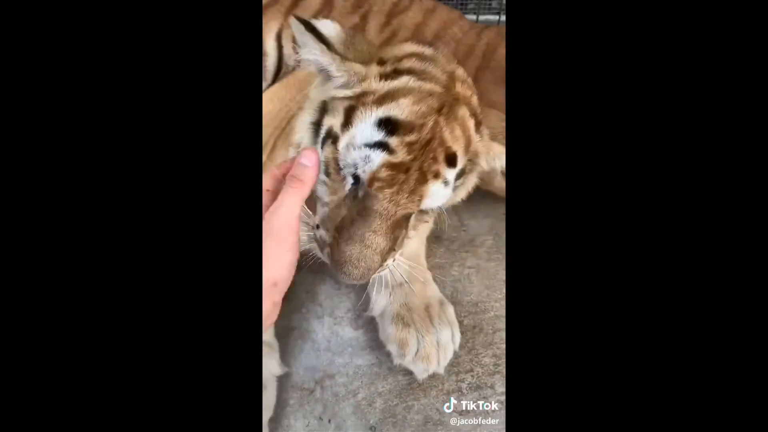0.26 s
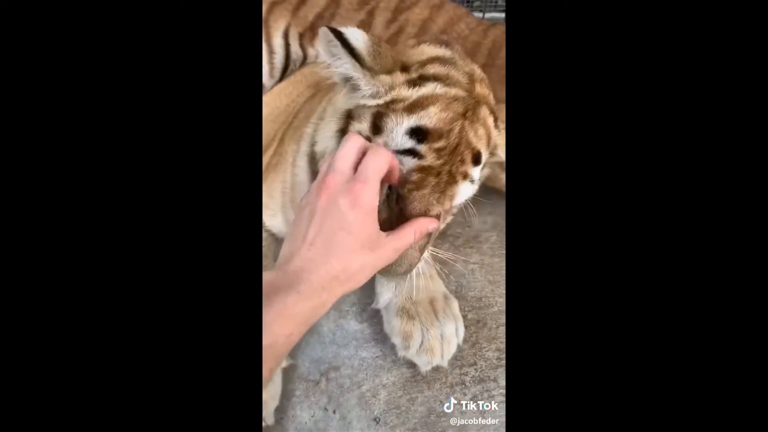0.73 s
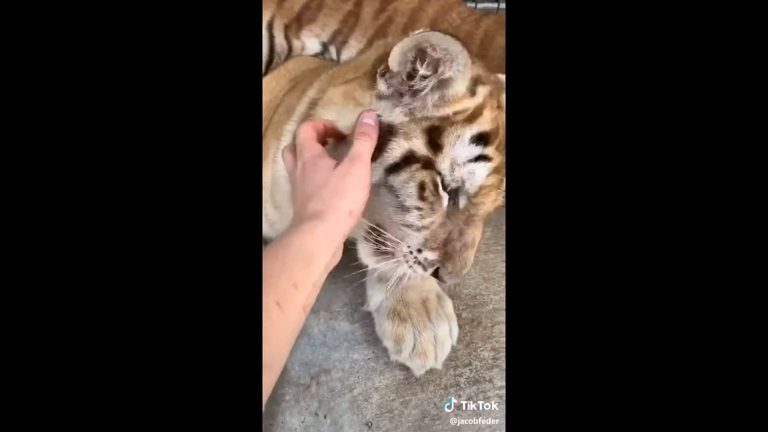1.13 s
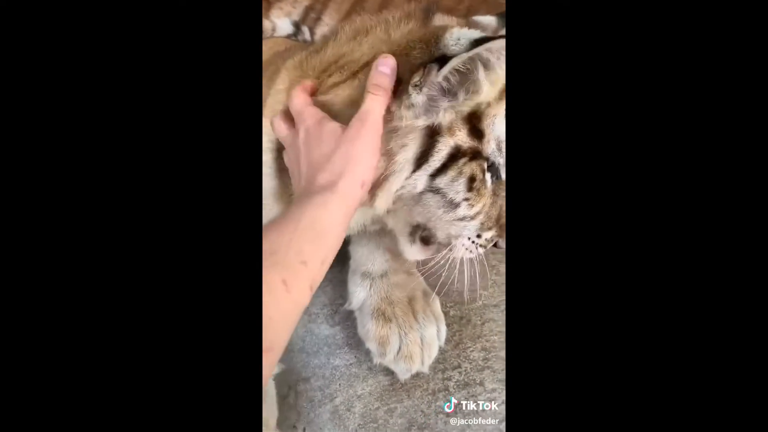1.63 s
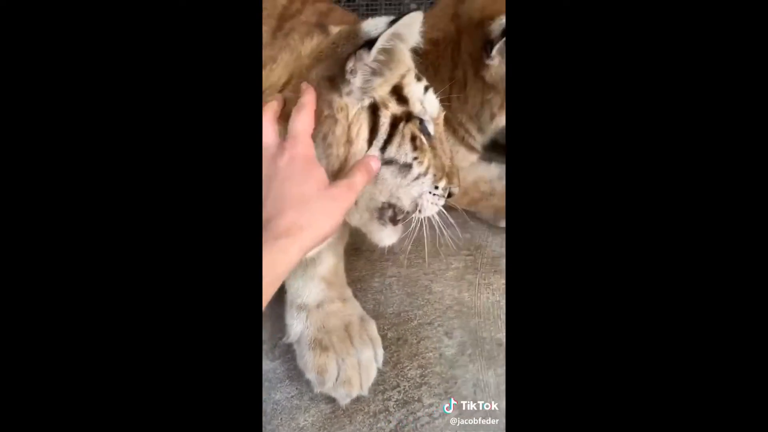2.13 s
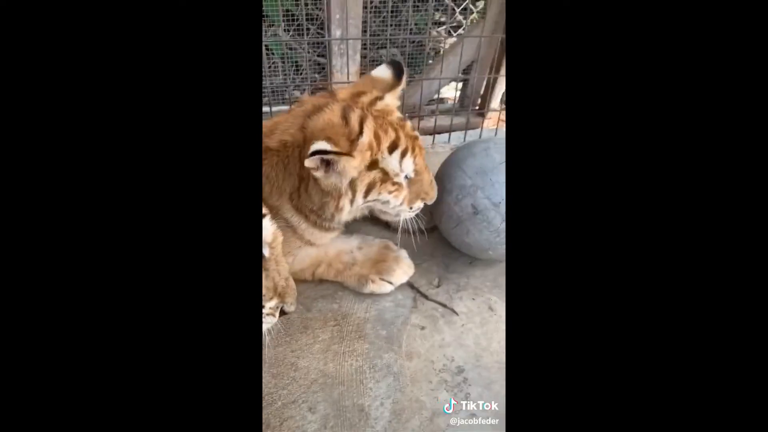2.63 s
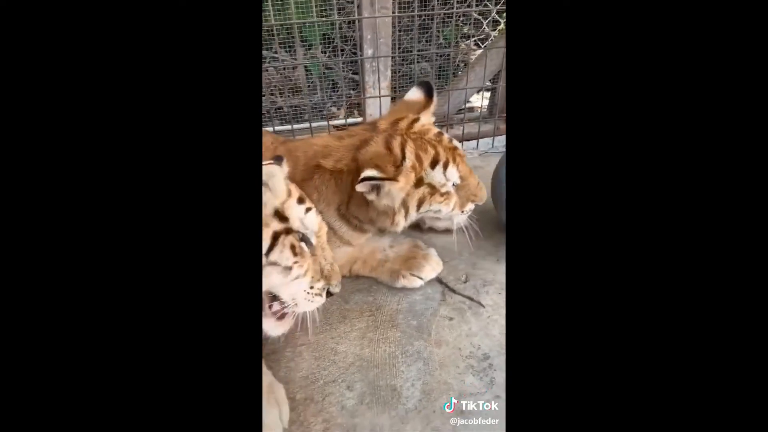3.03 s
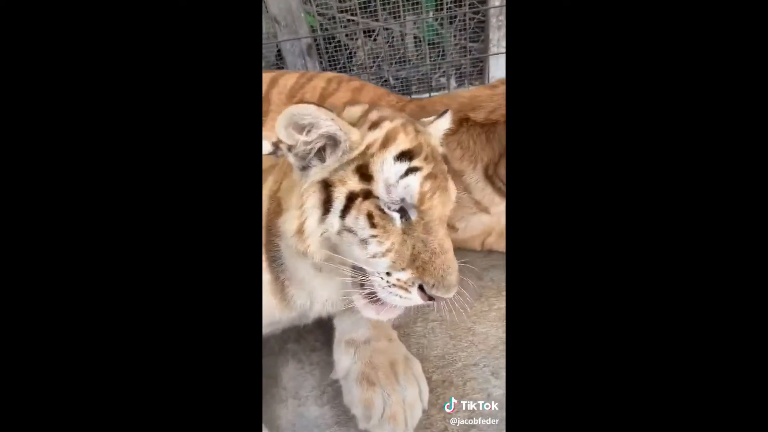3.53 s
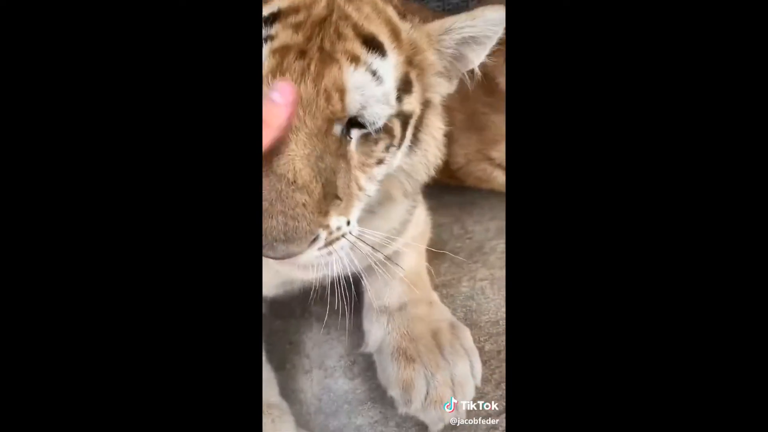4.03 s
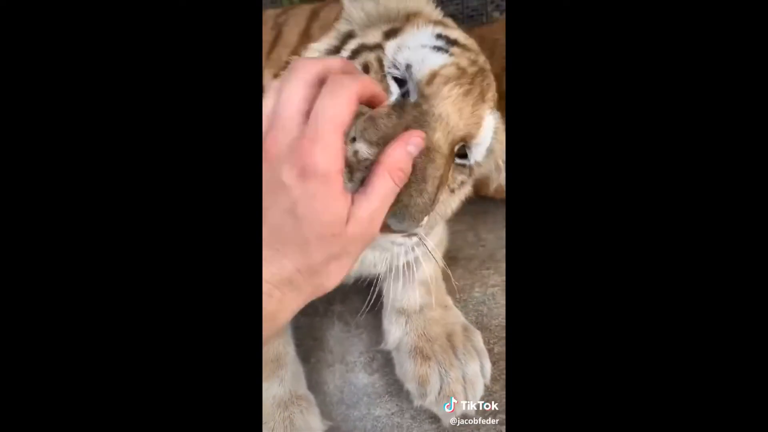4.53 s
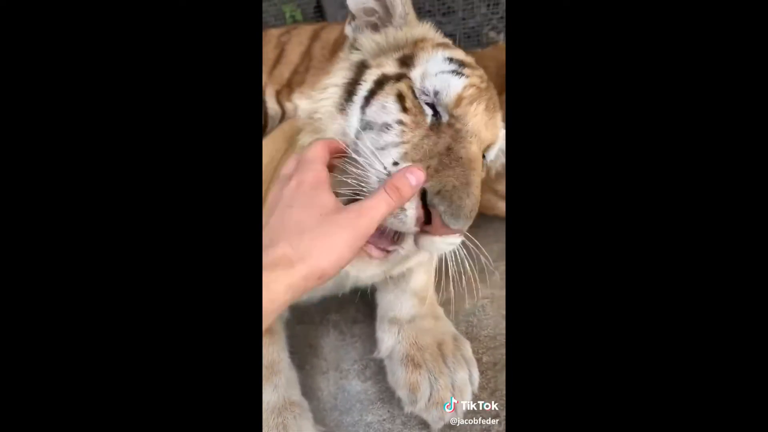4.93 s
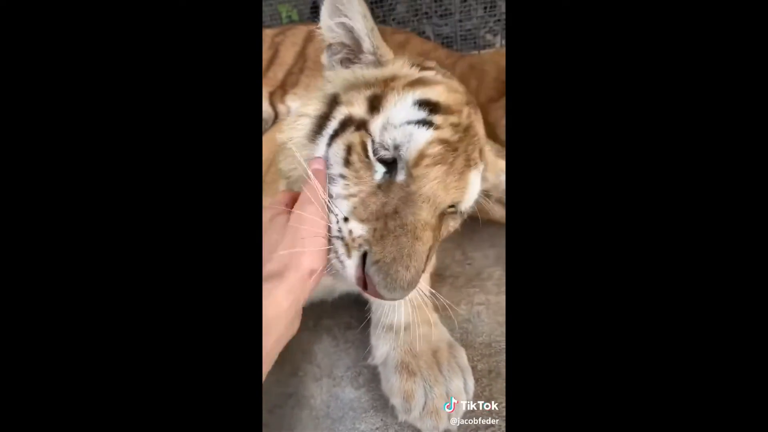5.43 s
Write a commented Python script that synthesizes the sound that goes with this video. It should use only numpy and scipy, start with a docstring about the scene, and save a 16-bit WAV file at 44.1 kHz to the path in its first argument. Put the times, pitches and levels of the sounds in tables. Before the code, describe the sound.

Close rasping big cat growl: a soft fast rattle, hard separate clacking pops, a pause, a snorting snarl, then steady slow popping again.

```python
"""In a roofed pen with a concrete floor, a young tiger is stroked close to a phone.
Its growl is a row of single throat pops, now a quick soft rattle, now slow and hard: folds burst open
and excite resonances, a low thump and a boom. Once it grunts and snarls, as a fold tone and shaped noise.
Wet lips click and air hisses as filtered noise; paws and fur stir.
The pen answers with echoes and a diffuse tail over a low hum."""
import sys
import numpy as np
from scipy import signal
from scipy.fft import rfft, irfft
from scipy.io import wavfile
from scipy.ndimage import uniform_filter1d, minimum_filter1d, map_coordinates

SR = 44100
rng = np.random.default_rng(int(sys.argv[2]) if len(sys.argv) > 2 else 0)


def wav_out(sig):
    """Save sig, one row per channel (or a flat mono array), as 16-bit PCM at SR to the path in sys.argv[1]."""
    wavfile.write(sys.argv[1], SR, np.round(np.clip(np.atleast_2d(sig).T, -1, 1) * 32767).astype(np.int16))


N = 249988
TIME, BINS = np.arange(N) / SR, np.fft.rfftfreq(N, 1 / SR)  # [s], [Hz]

# spectrum of air hissing at nose and teeth, and of brushed fur: (frequency [Hz], relative level [dB])
HISS_SPECTRUM = [(400, 7.5), (700, -6), (950, 9.5), (2400, 13), (2900, 11.5), (3500, 2), (4200, 10.5),
                 (5200, 8.5), (7200, 6), (9500, 1.5), (11000, 2), (13000, -40)]


def amp(db):
    """Level law: decibels to amplitude gain."""
    return 10 ** (np.asarray(db) / 20)


def unit(x):
    """Power normalization: scales to an rms of one."""
    return x / np.sqrt(np.mean(x ** 2) + 1e-20)


def read(points, hz):
    """Linear interpolation of a table on a log-frequency axis."""
    f, value = np.transpose(points)
    return np.interp(np.log(hz + 1), np.log(np.abs(f) + 1), value)


def add(mix, s, sound):
    """Superposition: adds a sound to the mix at time s."""
    part = mix[max(round(s * SR), 0):][:len(sound)]
    part += sound[:len(part)]


def colour(x, spectrum):
    """Minimum-phase filtering: gives white sound this spectrum, causally, and keeps its power."""
    hz = np.abs(np.fft.fftfreq(4096, 1 / SR))
    log_gain = np.log(unit(amp(read(spectrum, hz))))
    # the phase follows from the log gain by a Hilbert transform
    taps = np.fft.ifft(np.exp(np.conj(signal.hilbert(log_gain)))).real
    return signal.oaconvolve(x, taps[:len(taps) // 2])[:len(x)]


def drift(rate_hz):
    """Low-pass noise: a smooth random course of rms one with a Gaussian spectrum."""
    size = 8192
    hz = np.fft.rfftfreq(size, TIME[-1] / size)
    slow = irfft(rfft(rng.standard_normal(size)) * np.exp(-(hz / rate_hz) ** 2))
    return unit(np.interp(TIME, np.linspace(0, TIME[-1], size), slow))


def ring(t, hz, t60):
    """Free damped vibration: one mode that falls 60 dB in t60 seconds."""
    return np.sin(2 * np.pi * hz * t) * amp(-60 * t / t60)


def push(start, attack, hold, release):
    """Airflow envelope: linear rise, hold, then exponential decay of 60 dB over the release."""
    rise = np.clip((TIME - start) / attack, 0, 1)
    return rise * amp(-60 * np.maximum(TIME - start - attack - hold, 0) / release)


def bursts(times, levels_db, rise_s, decay_s, grain):
    """Transient turbulence: grainy noise with exponential rise and decay, levelled by its loudest 4 ms."""
    out, t = np.zeros(N), np.arange(SR // 8) / SR
    for s, db in zip(times, levels_db):
        noise, size = rng.standard_normal((2, len(t)))
        burst = noise * np.exp(grain * size - t / decay_s) * (1 - np.exp(-t / rise_s))
        add(out, s, amp(db) * burst / np.sqrt(uniform_filter1d(burst ** 2, SR // 250).max()))
    return out


def diffuse(pair):
    """Spatial coherence: two unrelated signals become one sound in two channels, band by band."""
    # likeness of the left and right channels: (frequency [Hz], correlation from -1 opposed to 1 alike)
    likeness = [(100, 1), (400, 0.87), (900, 0.14), (1250, 1), (1550, 0.66), (2150, 0.65), (2600, -0.78),
                (3800, 0.3), (4700, -0.6), (5700, -0.71), (7200, 1), (9400, 0.88), (10500, -0.48),
                (12500, -0.9121)]
    a, b = rfft(pair)
    same = np.clip(read(likeness, np.fft.rfftfreq(len(pair[0]), 1 / SR)), -1, 1)
    return irfft(np.array([a, same * a + np.sqrt(1 - same ** 2) * b]), len(pair[0]))


def ambience(level_db=-42, waver_db=2):
    """Stationary noise and steady tones: low rumble and faint hiss around the pen, with a wavering hum."""
    # rumble and hiss: (frequency [Hz], relative level [dB])
    spectrum = [(15, -22), (25, -8), (49, -8.5), (92, -12), (137, -2.5), (219, -19.5), (257, -22.5),
                (293, -17.5), (333, -24), (975, -34), (1270, -32.5), (2930, -36.5), (8330, -40),
                (13000, -48)]
    # hum before its wavering: (frequency [Hz], rms level [dB])
    hum_tones = [(123.7, -55), (61.9, -59)]
    noise = diffuse(np.array([colour(n, spectrum) for n in rng.standard_normal((2, N))]))
    hum = np.zeros(N)
    for hz, db in hum_tones:
        tone = unit(np.sin(2 * np.pi * hz * TIME + drift(rate_hz=0.9)))
        hum += amp(db + waver_db * drift(rate_hz=5.7)) * tone
    return amp(level_db) * unit(noise) + hum


def pen(x, onset_s=0.015):
    """Diffuse reverberation: the tail is strongest in the bass; it changes as the phone moves."""
    # decay of the pen, held to at least 0.02 s: (frequency [Hz], t60 [s])
    decay = [(100, 1.7), (200, 0.8), (500, -0.38), (1400, 0.17), (4000, 0.29), (10000, 0)]
    # strength of the pen: (frequency [Hz], gain [dB])
    strength = [(40, -3), (90, 0), (140, -4.5), (300, -9), (600, -6), (1300, -28), (3000, -13.5),
                (8000, -7)]
    out, count = np.zeros((2, N)), 3
    for k in range(count):
        noise = diffuse(rng.standard_normal((2, SR)))
        hz, t, z = signal.stft(noise, SR, nperseg=256)
        t60 = np.maximum(read(decay, hz), .02)[:, None]
        z *= amp(read(strength, hz)[:, None] - 60 * t / t60)
        z *= np.sqrt(2 * np.log(1000) / (t60 * SR))  # equal energy for any decay time
        tail = signal.istft(z, SR, nperseg=256)[1][:, :SR] * np.clip(TIME[:SR] / onset_s - .5, 0, 1)
        # the sound passes from tail to tail at constant total power
        share = np.cos(np.pi * (TIME * 2 + k / count)) * np.sqrt(2 / count)
        out += signal.fftconvolve((x * share)[None], tail, axes=1)[:, :N]
    return out


def far_walls(x, sway_s=0.00078):
    """Late specular reflection: roof and far walls return the body of each pop a few times, dull and late."""
    # late echoes: (delay [s], relative gain)
    paths = [(0.036, 0.62), (0.0403, 0.5), (0.0564, 0.6)]
    # their colour: (frequency [Hz], relative level [dB])
    spectrum = [(100, -13), (250, -5), (450, 5.5), (800, -10), (1150, -10), (2500, -20), (6000, -12.5)]
    dull = colour(x, spectrum) * amp(-26)
    out = np.zeros(N)
    for delay, gain in paths:
        out += gain * np.interp(TIME - delay - sway_s * drift(rate_hz=1.15), TIME, dull, left=0)
    return out


def reflect(x, sway_s=0.00007):
    """Early reflection: near surfaces return the sound; the paths change as the head moves."""
    # reflections from floor, body and walls: (delay [s], gain)
    paths = [(.0036, 0.67), (.0074, 0.9), (0.0178, 0.17), (0.026, 0.15)]
    out = x.copy()
    for delay, gain in paths:
        out += gain * np.interp(TIME - delay - sway_s * drift(rate_hz=1.83), TIME, x, left=0)
    return out


def shifting():
    """Impact and friction noise: the tiger shifts its weight with dull bumps, soft scuffs and a brush of fur."""
    # bumps of paws and body on the floor: (time [s], level [dB])
    bumps = [(2.923, -44), (3.309, -41), (3.498, -39)]
    # their spectrum: (frequency [Hz], relative level [dB])
    bump_spectrum = [(60, -11), (150, -2), (330, 10), (700, -15), (1500, -13), (4000, -51)]
    # scuffs on the floor: (start [s], attack [s], hold [s], release [s], level [dB])
    scuff_pushes = [(2.865, 0.02, 0.05, 0.2, -55), (3.285, 0.02, 0.05, 0.2, -52)]
    # their spectrum: (frequency [Hz], relative level [dB])
    scuff_spectrum = [(250, -3), (600, 4), (1300, 6), (2000, -9), (2800, -28), (8000, -31)]
    # fur brushing as the tiger turns its head: (time [s], level [dB])
    fur_course = [(3.1, -60), (3.24, -53), (3.3, -48), (3.37, -53.5), (3.5, -73)]
    fur_db = np.interp(TIME, *np.transpose(fur_course), left=-120, right=-120)
    fur = rng.standard_normal(N) * amp(fur_db)
    scuffs = rng.standard_normal(N) * sum(amp(db) * push(*shape) for *shape, db in scuff_pushes)
    thuds = bursts(*np.transpose(bumps), rise_s=0.0024, decay_s=0.0089, grain=0.172)
    return colour(thuds, bump_spectrum) + colour(fur, HISS_SPECTRUM) + colour(scuffs, scuff_spectrum)


def soft_swells():
    """Shaped flow noise: air rushes low through the nose in the growl; later comes a faint hollow swell."""
    # rush through the nose: (start [s], attack [s], hold [s], release [s], level [dB])
    *rush_shape, rush_db = (0.22, 0.14, 0.07, 0.45, -39)
    # hollow swell: (start [s], attack [s], hold [s], release [s], level [dB])
    *hollow_shape, hollow_db = (3.68, 0.07, 0.03, 0.22, -48)
    # spectrum of the rush: (frequency [Hz], relative level [dB])
    rush_spectrum = [(120, 5), (280, -3), (450, -4.5), (600, 2), (760, -2), (950, -2), (1500, -9),
                     (4000, -33)]
    # spectrum of the hollow swell: (frequency [Hz], relative level [dB])
    hollow_spectrum = [(400, -18), (790, -10), (900, -17), (1100, -2), (1350, -16), (2070, -14),
                       (3000, -40)]
    a, b = rng.standard_normal((2, N))
    rush = colour(a * amp(rush_db) * push(*rush_shape), rush_spectrum)
    return rush + colour(b * amp(hollow_db) * push(*hollow_shape), hollow_spectrum)


def lip_clicks(click_db=-2):
    """Impulsive noise: smacks of lips and tongue."""
    # louder smacks: (time [s], relative level [dB])
    smacks = [(0.24, -24.5), (0.326, -29), (1.1438, -27), (1.2067, -28), (1.5213, -30), (1.928, -19),
              (1.974, -28), (2.2611, -26.5), (2.3492, -33.5), (4.4586, -27.5), (4.525, -29.5),
              (5.11, -22.5), (5.216, -24.5), (5.3805, -29.5)]
    # their spectrum: (frequency [Hz], relative level [dB])
    spectrum = [(500, 1), (900, -2), (1700, 13.5), (2700, -1.5), (4200, 4.5), (7500, 6), (10000, 2),
                (13000, -1)]
    s, db = np.transpose(smacks)
    return colour(bursts(s, db + click_db, rise_s=0.00043, decay_s=0.0075, grain=0.08), spectrum)


def choke(pops, depth_db=11, ahead_s=0.0073, width_s=0.0046):
    """Flow modulation: gain of the air that gets through, as the folds shut just before each pop."""
    shut = np.zeros(N)
    t = np.arange(SR // 20) / SR
    for s, *_ in pops:
        add(shut, s - ahead_s - t.mean(), np.exp(-((t - t.mean()) / width_s) ** 2))
    return amp(-depth_db * np.minimum(shut, 1))


def muzzle_air(pops, flutter_db=4.5):
    """Turbulence noise: fluttering air rasps in the throat and hisses at nose and teeth."""
    # pushes of air under the growls and as a snort and a sniff:
    # (start [s], attack [s], hold [s], release [s], throat rasp level [dB], hiss level [dB])
    pushes = [(0.0, 0.11, 0.76, 0.24, -38.5, -56), (0.3, 0.16, 0.13, 0.49, -59, -47.5),
              (1.126, 0.032, 0.13, 0.17, -46.5, -47.5), (1.445, 0.21, 0.26, 0.55, -38, -47),
              (2.161, 0.08, 0.16, 0.33, -51, -49.5), (4.072, 0.097, 0.044, 0.58, -28.5, -33),
              (4.233, 0.071, 0.064, 0.19, -37, -48), (4.448, 0.039, 0.029, 0.19, -33, -57),
              (4.779, 0.2, 0.72, 0.23, -38.5, -60)]
    # spectrum of the rasp: (frequency [Hz], relative level [dB])
    rasp_spectrum = [(60, -7.5), (150, 11.5), (300, 3), (500, -11), (700, -6), (900, -29), (1080, -21),
                     (1220, 5), (1370, -6), (1540, 4.5), (1750, -1), (2100, -20), (2700, -10), (4500, -31)]
    rasp, hiss = np.zeros((2, N))
    for *shape, rasp_db, hiss_db in pushes:
        flow = push(*shape)
        rasp += amp(rasp_db) * flow
        hiss += amp(hiss_db) * flow
    a, b = rng.standard_normal((2, N)) * unit(amp(flutter_db * drift(rate_hz=120)))
    return colour(a * rasp * choke(pops), rasp_spectrum) + colour(b * hiss, HISS_SPECTRUM)


def cracks(pops, crack_db=-1, puff_db=-19, leak_db=-19, leak_s=0.0042):
    """Pressure release: air leaks for a moment, the wet folds part with a bright snap, and a puff follows."""
    # (frequency [Hz], relative level [dB])
    spectrum = [(400, -9), (650, 13), (880, -0.5), (1500, 18.5), (3400, 3), (4700, 2), (6500, 3.5),
                (9000, -3), (11000, -10), (13000, -11)]
    s, *_, db = np.transpose(pops)
    leak = bursts(s - leak_s, db + leak_db, rise_s=0.0045, decay_s=0.004, grain=0.097)
    snap = bursts(s, db + crack_db, rise_s=0.00021, decay_s=0.0013, grain=0.075)
    puff = bursts(s, db + puff_db, rise_s=0.0008, decay_s=0.028, grain=0.1)
    return colour(leak + snap + puff, spectrum)


def mouth(x, cavity_db=-7, path_s=0.0023, sway=0.1893):
    """Comb filtering: noises bounce once along the mouth, whose length changes as the jaw moves."""
    delay = SR * path_s * (1 + sway * drift(rate_hz=2.04))  # samples
    return x + amp(cavity_db) * map_coordinates(x, [np.arange(N) - delay], order=3)


def muzzle_noises(pops):
    """Superposition of all that hisses, rasps or clicks in the muzzle, resounding in the mouth."""
    return mouth(muzzle_air(pops) + soft_swells() + cracks(pops) + lip_clicks())


def fold_tone(rows, partials, jitter, shimmer_db, dulling_db_per_s=0):
    """Periodic fold vibration: an unsteady harmonic tone whose overtones may die away."""
    s, hz, db = np.transpose(rows)
    out, on = np.zeros(N), (TIME > s[0]) & (TIME < s[-1])
    t = TIME[on]
    turns = np.cumsum(np.interp(t, s, hz) * (1 + jitter * drift(rate_hz=71)[on])) / SR
    gains = [amp(level - dulling_db_per_s * (t - s[0]) * (k > 1)) for k, level in partials]
    tone = sum(gain * np.sin(2 * np.pi * k * turns) for (k, _), gain in zip(partials, gains))
    edges = np.minimum(np.minimum(t - s[0], s[-1] - t) / .005, 1)
    level = amp(np.interp(t, s, db) + shimmer_db * drift(rate_hz=14.0)[on]) * edges
    out[on] = level * tone / np.sqrt(sum(gain ** 2 for gain in gains) / 2)
    return out


def whistle():
    """Pure tone with random modulation: a faint unsteady whistle between the slow pops."""
    # (time [s], pitch [Hz], level [dB])
    course = [(1.6, 1720, -38), (1.68, 1716, -37), (1.73, 1667, -53), (1.9, 1630, -39.5)]
    return fold_tone(course, [(1, 0)], jitter=0.015, shimmer_db=12.5)


def drones():
    """Harmonic vibration: the chest hums under the quick rattles, in two stretches."""
    # one list for each stretch: (time [s], pitch [Hz], level [dB])
    stretches = [
        [(0.48, 170.3, -39), (0.57, 177.7, -38), (0.7, 200.3, -38), (1.05, 182.6, -37)],
        [(2.0, 128.1, -39), (2.15, 134, -33.5), (2.5, 120.3, -41.5)],
    ]
    # (harmonic number, relative level [dB])
    partials = [(1, 0.5), (2, -14)]
    return sum(fold_tone(course, partials, jitter=0.029, shimmer_db=0) for course in stretches)


def grunt():
    """Harmonic vibration with damped overtones: the grunt that opens the snort."""
    # (time [s], pitch [Hz], level [dB])
    course = [(4.028, 112, -22.5), (4.045, 116, -26), (4.062, 136, -22), (4.085, 142, -34),
              (4.122, 150, -28), (4.18, 125, -44)]
    # (harmonic number, relative level at the start [dB])
    partials = [(1, 2), (2, 10), (3, -17)]
    return fold_tone(course, partials, jitter=0.1, shimmer_db=4.5, dulling_db_per_s=450)


def whine():
    """Harmonic vibration: the thin whine above the grunt."""
    # (time [s], pitch [Hz], level [dB])
    course = [(4.08, 344, -54), (4.1, 365, -41), (4.14, 390.5, -32.5), (4.19, 411.5, -35),
              (4.225, 394, -33.5), (4.25, 343, -39)]
    # (harmonic number, relative level [dB])
    partials = [(1, 2), (2, -4), (3, -22), (4, -10), (5, -5), (6, -15)]
    return fold_tone(course, partials, jitter=0.0088, shimmer_db=3.0)


def snarl(surge_db=2, flutter_db=3):
    """Formant resonance: uneven air sounds the modes of the mouth, which rise and sink with the jaw."""
    # (time [s], mouth resonances over their rest pitch [ratio], level [dB])
    course = [(4.09, 1.16, -48), (4.14, 1.0, -38), (4.225, 1.02, -33), (4.34, 0.99, -39), (4.42, 1, -58)]
    # resonances of the snarling mouth at rest: (frequency [Hz], width [Hz], relative level [dB])
    modes = [(1290, 57, -9), (1470, 130, -9), (1730, 107, 0.5), (2140, 220, -11.5)]
    s, jaw, db = np.transpose(course)
    turns, out = np.cumsum(np.interp(TIME, s, jaw)) / SR, np.zeros(N)
    for hz, width, level in modes:
        angle = 2 * np.pi * hz * turns
        # two slow random courses make a noise band around the mode
        band = drift(rate_hz=width / 2) * np.cos(angle) + drift(rate_hz=width / 2) * np.sin(angle)
        out += amp(level) * band
    sounding = uniform_filter1d(1. * (TIME > s[0]) * (TIME < s[-1]), SR // 50)
    flow = amp(np.interp(TIME, s, db)) * sounding
    return unit(out) * flow * amp(surge_db * drift(rate_hz=23) + flutter_db * drift(rate_hz=170))


def boom(pops, build_s=0.0086, scatter=0.0451):
    """Modal decay: each thump leaves a low boom that swells and dies."""
    # modes before random detuning: (frequency [Hz], level over the thump's table level [dB], t60 [s])
    modes = [(85.4, -30, 0.33), (104.7, -17.5, 0.34), (124, -18.5, 0.87), (168.5, -16, 0.87),
             (342.2, -13.5, 0.17)]
    out, t = np.zeros(N), np.arange(SR // 2) / SR
    for s, *_, db, _ in pops:
        shifts = 1 + scatter * rng.standard_normal(len(modes))
        tail = sum(amp(level) * ring(t, hz * k, t60) for (hz, level, t60), k in zip(modes, shifts))
        add(out, s, amp(db) * tail * (1 - np.exp(-t / build_s)))
    return out


def shudder(pops, shudder_db=-14.0):
    """Damped tissue vibration: loose tissue shakes on roughly, so that quick pops run together."""
    # (frequency [Hz], relative level [dB])
    spectrum = [(50, -14.5), (95, 1), (160, -2), (330, -3.5), (480, -11), (750, -15.5), (1000, -17.5),
                (3000, -61)]
    s, *_, db, _ = np.transpose(pops)
    return colour(bursts(s, db + shudder_db, rise_s=0.0019, decay_s=0.03, grain=0.096), spectrum)


def chest_thumps(pops):
    """Volume displacement: each pop pushes out a low thump that sinks as the folds close; soft ones start lower."""
    thump_db, hard_db, slack, scatter = 6, -13, 0.71, 0.09
    start_hz, end_hz, cutoff_hz = 440, 172, 75  # pitches of a hard thump, before scatter
    fall_s, peak_s, lag_s = 0.0026, 0.0027, 0.0014
    out, t = np.zeros(N), np.arange(SR // 20) / SR
    for s, *_, db, _ in pops:
        drop_hz = (start_hz - end_hz) * amp(slack * min(db - hard_db, 0))
        hz = (end_hz + drop_hz * np.exp(-t / fall_s)) * (1 + scatter * rng.standard_normal())
        swell = (t / peak_s * np.exp(1 - t / peak_s)) ** 2
        thump = swell * np.sin(2 * np.pi * np.cumsum(hz) / SR)
        add(out, s + lag_s, -amp(db + thump_db) * thump)
    return signal.sosfilt(signal.butter(2, cutoff_hz, "highpass", fs=SR, output="sos"), out)


def valley(x, cutoff_hz=1060):
    """High-pass transmission: the throat passes almost nothing just below its first resonance."""
    return signal.sosfilt(signal.butter(5, cutoff_hz, "highpass", fs=SR, output="sos"), x)


def bounces(pops):
    """Damped rebound: the folds bounce after each pop in a few uneven pulses that tend to weaken."""
    bounce_db, scatter_db, fade_db_per_s = -10, 2.0, 230
    first_s, gap_s, mode_t60, upper_db = 0.017, 0.012, 0.054, -8
    low_db, low_hz, low_t60 = -5, 260, 0.029
    high, low = np.zeros((2, N))
    t, count = np.arange(SR // 20) / SR, 5
    for s, _, lower_hz, upper_hz, _, db, _, _ in pops:
        modes = ring(t, lower_hz, mode_t60) + amp(upper_db) * ring(t, upper_hz, mode_t60)
        delay = first_s
        for wait, size in rng.standard_normal((count, 2)):
            gain = amp(db + bounce_db + scatter_db * size - fade_db_per_s * (delay - first_s))
            add(high, s + delay, gain * modes)
            add(low, s + delay, gain * amp(low_db) * ring(t, low_hz, low_t60))
            delay += gap_s * np.exp(wait / 2)
    return valley(high) + low


def after_ring(pops):
    """Re-excited resonance: once the folds shut, the lower mode swells flatter; then air keeps a ragged ring."""
    rebound_db, rebound_s, width_s, sag = -2, 0.024, 0.005, 0.017
    tail_db, tail_t60, build_s = -7, 0.27, 0.031
    upper_db, top_db, top_hz, mode_t60 = -7, -8, 1690, 0.073
    out, t = np.zeros(N), np.arange(SR // 3) / SR
    swell = np.exp(-((t - rebound_s) / width_s) ** 2)
    fade = (1 - np.exp(-t / build_s)) * amp(-60 * t / tail_t60)
    for s, _, lower_hz, upper_hz, _, db, _, _ in pops:
        hz = lower_hz * (1 - sag)
        modes = ring(t, hz, mode_t60) + amp(upper_db) * ring(t, upper_hz, mode_t60)
        modes += amp(top_db) * ring(t, top_hz, mode_t60)
        # noise convolved with the modes rings unevenly
        ragged = unit(irfft(rfft(rng.standard_normal(len(t))) * rfft(modes), len(t)))
        rebound = amp(rebound_db) * swell * np.sin(2 * np.pi * hz * t)
        add(out, s, amp(db) * (rebound + amp(tail_db) * fade * ragged))
    return valley(out)


def throat_pops(pops):
    """Source and filter: air leaks, the slack folds burst open, and the throat rings, sinking in pitch."""
    # modes above the two moving ones, before random detuning: (frequency [Hz], relative level [dB], t60 [s])
    fixed_modes = [(1762, -6.5, 0.038), (2050, -11.5, 0.025), (2343, -15, 0.013), (2986, -27, 0.021),
                   (3353, -30, 0.043), (3855, -24.5, 0.028)]
    ring_db, lower_t60, upper_t60, scatter = 1.0, 0.052, 0.059, 0.03
    glide, glide_s = 0.12, 0.0012  # the pitch starts this share sharp and settles in this time
    leak_db, leak_s, flutter_db, flutter_s = -35, 0.0067, -25, 0.0059  # air before and after the burst
    softness, damping, open_s, shut_s = 0.35, 2, 0.00062, 0.02
    out, t = np.zeros(N), np.arange(SR // 12) / SR
    lead = SR // 60  # samples of leaking air ahead of the burst
    since = t - lead / SR
    # the resonances start sharp while the folds are open and settle as they shut
    sinking = t + glide * glide_s * (1 - np.exp(-t / glide_s))
    leak = amp(leak_db) * np.exp(-abs(since) / leak_s)
    flutter = amp(flutter_db) * np.exp(-abs(since) / flutter_s)
    air = np.where(since < 0, leak, flutter)
    for s, db, lower_hz, upper_hz, lower_db, *_ in pops:
        shifts = 1 + scatter * rng.standard_normal(len(fixed_modes))
        throat = amp(lower_db) * ring(sinking, lower_hz, lower_t60) + ring(sinking, upper_hz, upper_t60)
        for (hz, level, t60), k in zip(fixed_modes, shifts):
            throat += amp(level) * ring(sinking, hz * k, t60)
        throat *= 1 - np.exp(-t / open_s)  # the folds take a moment to open
        throat *= np.exp(-(t / shut_s) ** 2)  # and choke the ring as they shut
        throat *= np.exp(damping * db * t)  # slack folds damp the weak pops
        drive = air * amp(-softness * db) * rng.standard_normal(len(t))  # weak pops are more turbulent
        drive[lead] += 2  # the burst
        pop = valley(signal.fftconvolve(drive, throat)[:len(t)])
        pop /= np.sqrt(uniform_filter1d(pop ** 2, SR // 250).max())
        early = max(lead - round(s * SR), 0)  # samples that fall before the start
        add(out, s - lead / SR, amp(db + ring_db) * pop[early:] / 2)
    return out


def rattle(start, length, gap, gap_ratio, ring_db, thump_db, swell_db):
    """Self-sustained oscillation: the folds flap in a run, and stronger pops crack much more."""
    shortest_gap_s = 0.014  # the folds cannot flap faster
    swell_curve = 0.35  # below 1, the level changes early in a run
    lower_rest_hz, lower_scatter, scatter_db = 1222, 0.015, 2.5
    upper_ratio, upper_scatter = 1.26, 0.031  # the upper throat resonance over the lower one
    lower_db, after_db = 4.5, -6.5  # lower resonance over the upper one; after-ring over the ring
    crack_db, crack_growth = 6.5, 1.57  # crack at a ring of 0 dB, and its dB per dB of ring
    rows, t = [], 0
    for loud, heavy, tight, wide in rng.standard_normal((round(1 / shortest_gap_s), 4)):
        if t > length:
            break
        change_db = swell_db * (t / length) ** swell_curve
        db = ring_db + change_db + scatter_db * loud
        low_db = thump_db + change_db + scatter_db * heavy
        lower_hz = lower_rest_hz * (1 + lower_scatter * tight)
        upper_hz = lower_hz * upper_ratio * (1 + upper_scatter * wide)
        snap_db = crack_db + crack_growth * db
        rows.append((start + t, db, lower_hz, upper_hz, lower_db, db + after_db, low_db, snap_db))
        t += max(gap, shortest_gap_s)
        gap *= gap_ratio
    return rows


def growl_pops():
    """Pulse-train excitation: the distinct pops of the throat and the quick runs between them."""
    # (time [s], ring level [dB], lower resonance [Hz], upper resonance [Hz], lower over upper [dB],
    #  after-ring level [dB], chest thump level [dB], crack level [dB]); all levels relative
    distinct = [(0.004, -16, 1233, 1610, 13, -35, -17.5, -36), (0.041, -18, 1210, 1596, -4, -39, -22, -31),
                (0.079, -18, 1227, 1640, 6, -28, -23, -51), (0.115, -20.5, 1220, 1680, 2, -40, -25, -50),
                (0.419, -19, 1260, 1546, 4, -33, -29, -25.5), (0.456, -17, 1210, 1500, -2.5, -40, -24, -33),
                (0.496, -21.5, 1235, 1450, -1, -30, -28.5, -45.5),
                (0.538, -16, 1212, 1500, -4, -32, -24.5, -31), (0.586, -22.5, 1223, 1520, 0, -26, -23, -42),
                (0.629, -19, 1220, 1485, -1.5, -28, -26, -31.5),
                (0.671, -22.5, 1165, 1540, -9, -43, -24.5, -48),
                (0.885, -21, 1204, 1450, -5, -44, -23, -30.5),
                (0.923, -21.5, 1210, 1536, -3, -26, -21.5, -31.5),
                (1.1299, -37, 1190, 1530, 12, -38, -20, -25), (1.4107, -15, 1204, 1530, 2, -14, -14, -4.5),
                (1.5934, -15, 1249, 1608, -8.5, -19.5, -12.5, -5.5),
                (1.756, -18, 1270, 1700, -3, -27, -35, -29),
                (1.7652, -4.5, 1233, 1556, 3.5, -11.5, -11, -9), (1.806, -18, 1230, 1543, 6, -19, -17, -36),
                (1.9067, -11, 1277, 1545, 6, -11.5, -14, -6), (2.007, -5, 1257, 1533, -1.5, -22, -16, -12),
                (2.0865, -12.5, 1168, 1515, 2.5, -37, -17, -18.5),
                (2.138, -14, 1210, 1534, 3.5, -28, -20.5, -13),
                (2.1875, -13.5, 1164, 1520, 1, -39, -16.5, -29),
                (2.224, -16, 1194, 1524, -2, -39, -30, -30.5),
                (2.256, -17.5, 1186, 1510, 3.5, -36, -22.5, -31),
                (4.0258, -19, 1242, 1574, -11, -22, -19, -21),
                (4.1855, -16.5, 1286, 1590, 8, -37, -32, -30),
                (4.7743, -5, 1223, 1470, -5.5, -14.5, -14.5, -7.5),
                (4.9263, -5, 1227, 1519, 2, -15, -13.5, -4.5),
                (5.0654, -7.5, 1255, 1506, -6.5, -15.5, -16, -8.5),
                (5.1916, -7, 1293, 1539, -3.5, -19, -11.5, -11.5),
                (5.3071, -7, 1277, 1526, -4, -21.5, -12.5, -21),
                (5.4137, -6.5, 1259, 1560, 2.5, -24, -15, -9.5),
                (5.5125, -8.5, 1260, 1567, 8, -27, -15, -18.5),
                (5.5978, -7.5, 1285, 1530, 2.5, -20, -14, -14)]
    # runs of soft flaps: (start [s], length [s], first gap [s], each gap over the one before [ratio],
    #  ring level [dB], chest thump level [dB], swell by the end [dB])
    runs = [(0.146, 0.14, 0.031, 1.0, -27.5, -25, -9), (0.319, 0.08, 0.0235, 1.05, -22.5, -29, 0),
            (0.708, 0.165, 0.033, 0.915, -28, -24, -4), (0.962, 0.085, 0.027, 0.9, -29, -26, 0),
            (2.283, 0.11, 0.0235, 0.93, -29.5, -22.5, -7)]
    return list(distinct) + [pop for run in runs for pop in rattle(*run)]


def channels(x):
    """Interchannel differences: level and phase between the left and right channels."""
    # (frequency [Hz], left minus right [dB])
    balance = [(60, 0.5), (110, -1), (200, 0), (370, -1.5), (670, -0.5), (1220, -3.5), (2240, 0.5),
               (7480, 0)]
    # how far the left channel leads: (frequency [Hz], phase [rad])
    phase_lead = [(60, 0.0093), (1700, 0.7), (2600, 0.27)]
    half = np.array([[1], [-1]]) / 2
    sides = amp(read(balance, BINS) * half) * np.exp(1j * read(phase_lead, BINS) * half)
    return irfft(rfft(x) * sides, N)


def scene():
    """Superposition: the tiger close by and the pen around it; each channel hears its own reflections."""
    pops = growl_pops()
    throat = throat_pops(pops)
    thumps = chest_thumps(pops) + shudder(pops)
    rings = np.array([reflect(throat), reflect(throat)])
    rings += after_ring(pops) + bounces(pops) + snarl() + whistle()
    muzzle = diffuse([muzzle_noises(pops) + shifting(), muzzle_noises(pops) + shifting()])
    voice = grunt() + whine() + drones()
    room = pen(rings[0] + muzzle[0] + thumps + amp(-2.5) * voice) + far_walls(muzzle[0] + thumps)
    tiger = rings + muzzle + thumps + boom(pops) + voice + room
    return channels(tiger) + ambience()


def record(dry, ceiling=0.96, edge_hz=13250):
    """Peak limiting and band limiting: the phone holds down the hardest pops, then cuts the top."""
    allowed = np.minimum(1, ceiling / (np.abs(dry).max(0) + 1e-9))
    held = dry * uniform_filter1d(minimum_filter1d(allowed, SR // 400), SR // 400)
    low_pass = signal.firwin(255, edge_hz, window=("kaiser", 8), fs=SR)
    return signal.oaconvolve(held, low_pass[None], "same")


dry = scene()
out = record(dry)
wav_out(out)
```